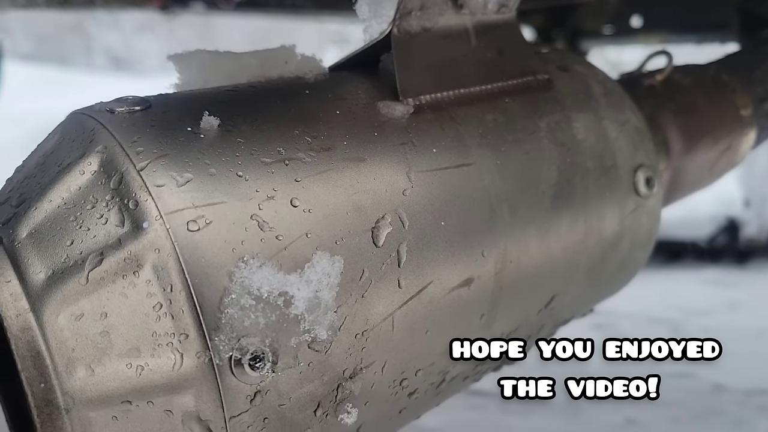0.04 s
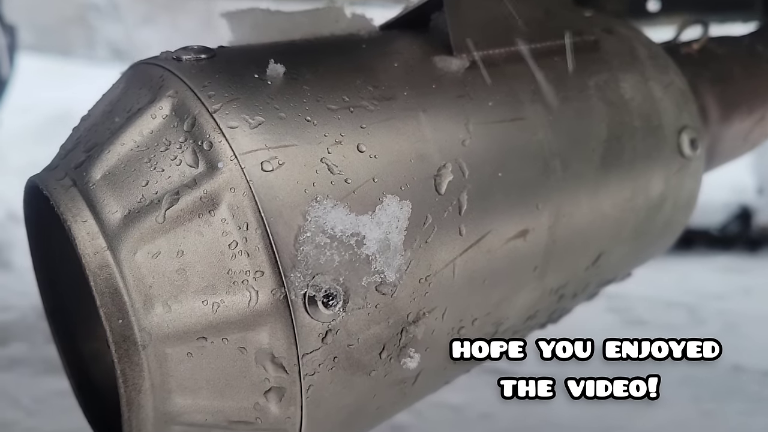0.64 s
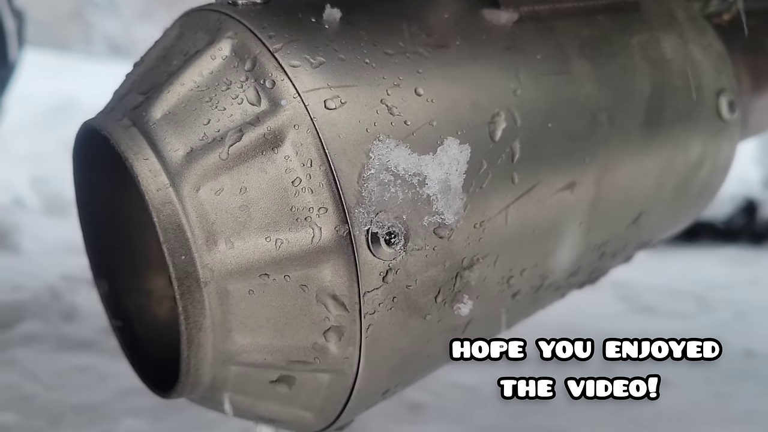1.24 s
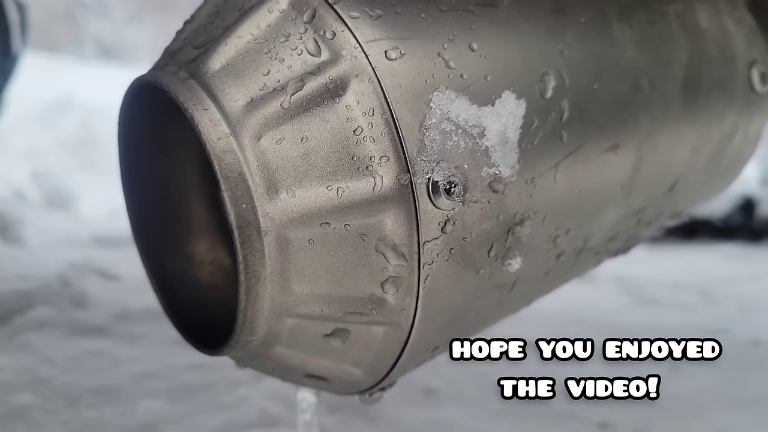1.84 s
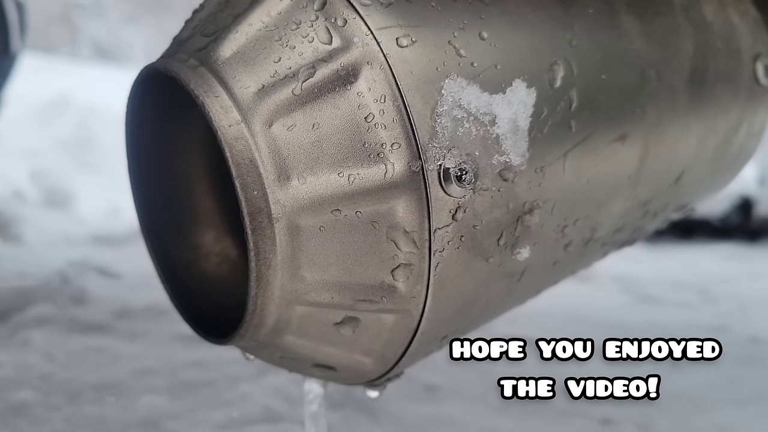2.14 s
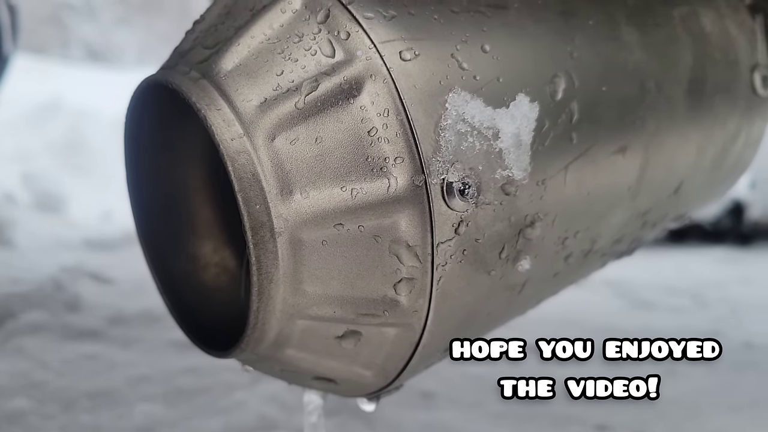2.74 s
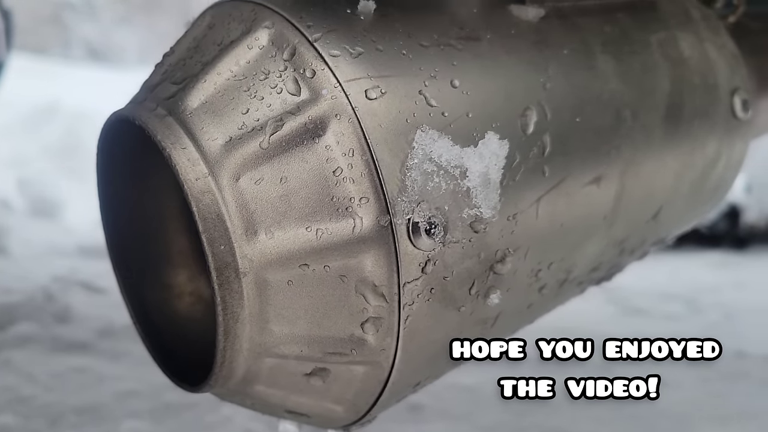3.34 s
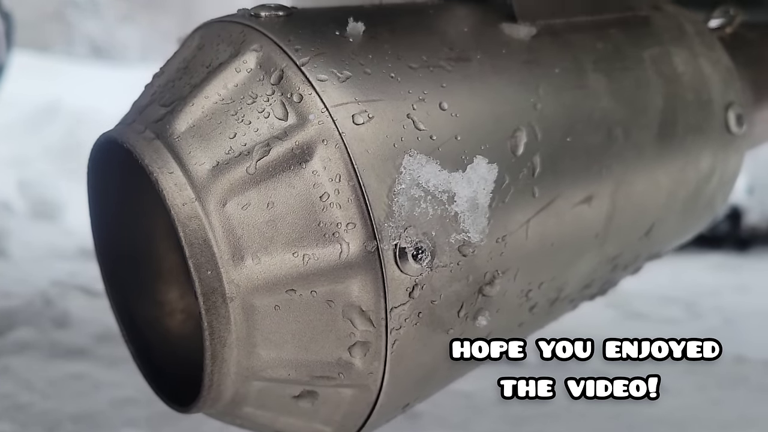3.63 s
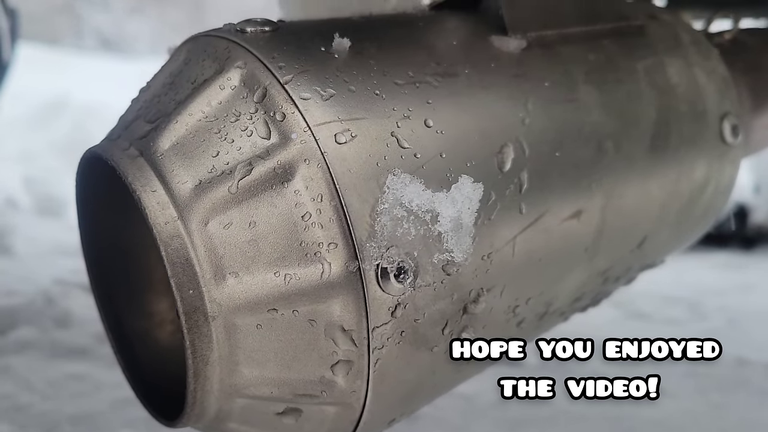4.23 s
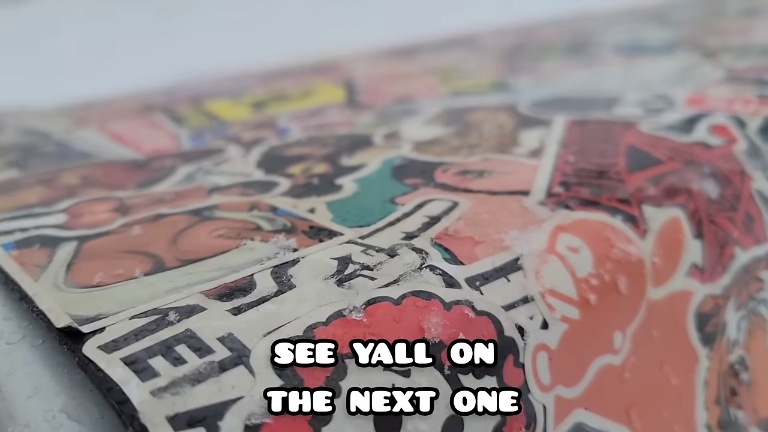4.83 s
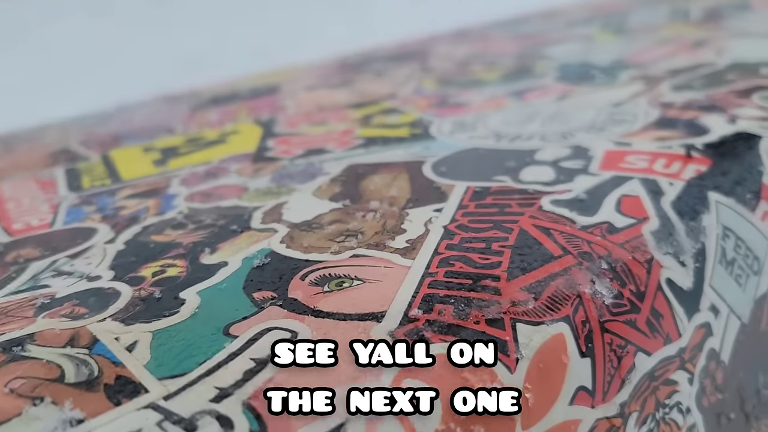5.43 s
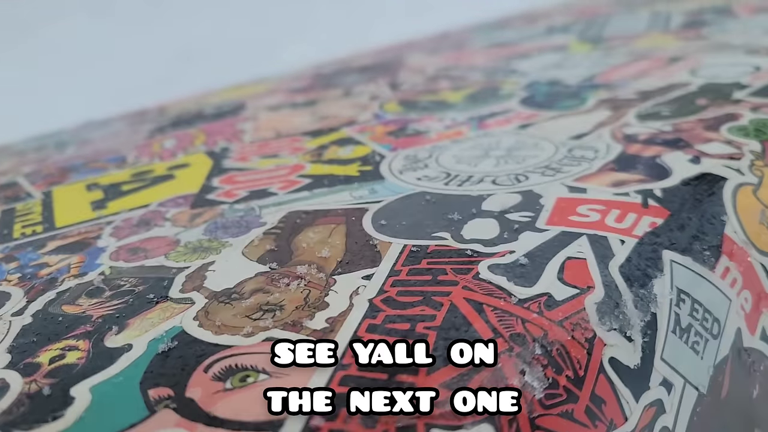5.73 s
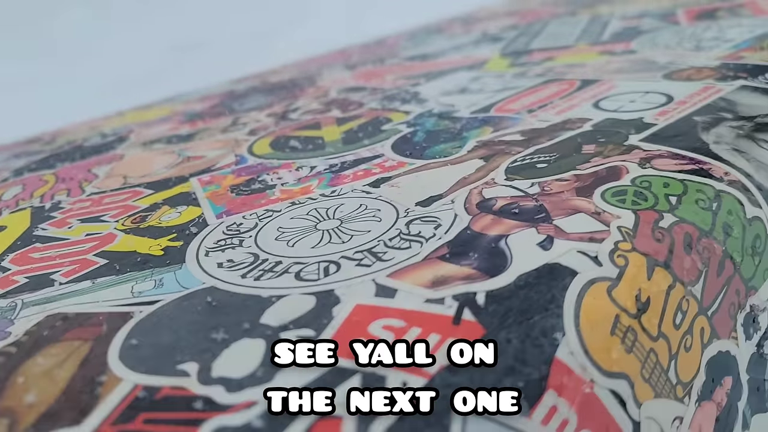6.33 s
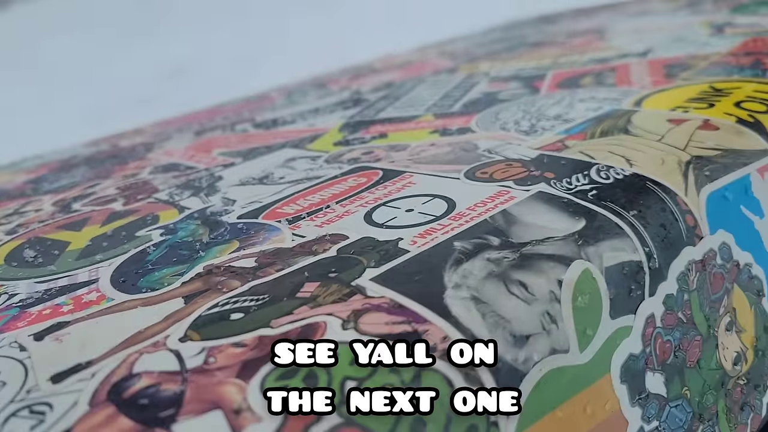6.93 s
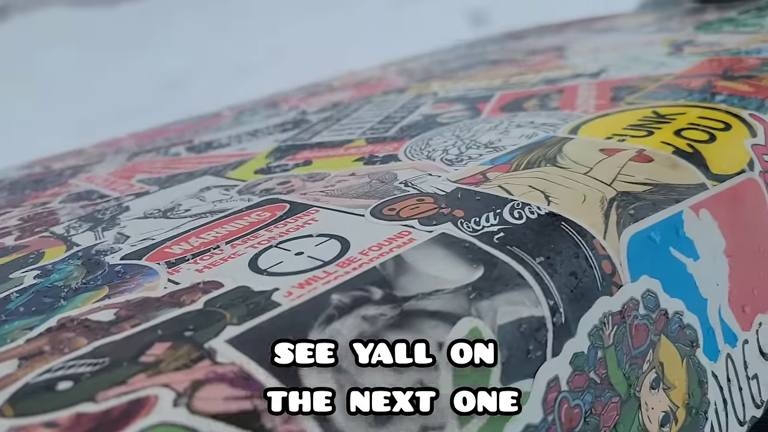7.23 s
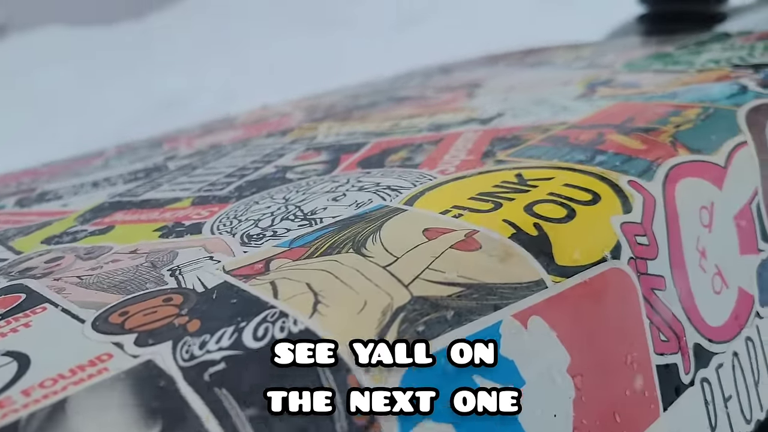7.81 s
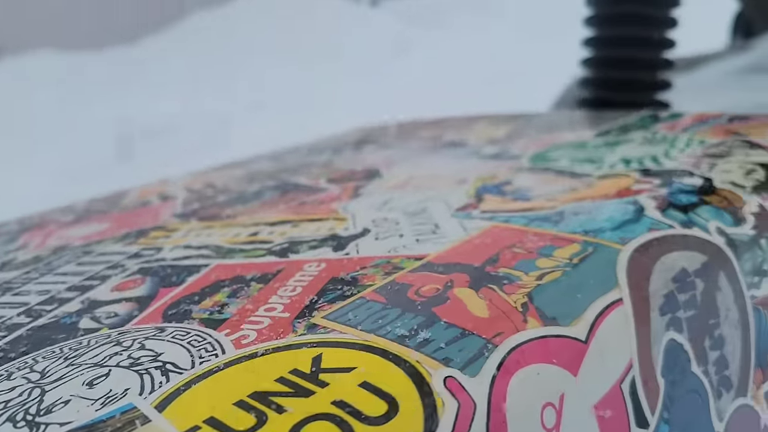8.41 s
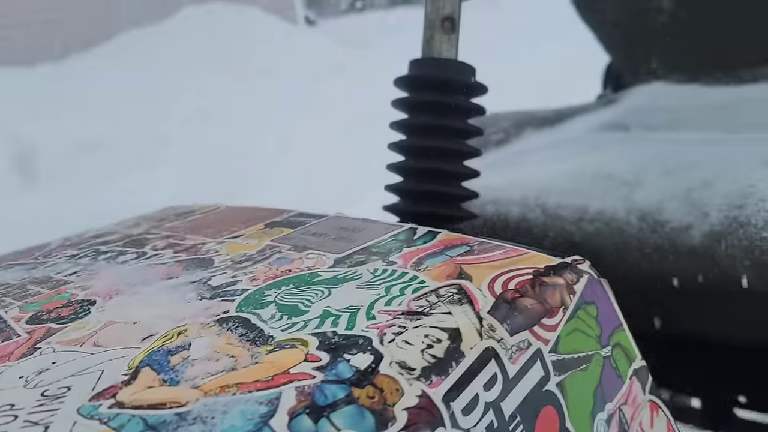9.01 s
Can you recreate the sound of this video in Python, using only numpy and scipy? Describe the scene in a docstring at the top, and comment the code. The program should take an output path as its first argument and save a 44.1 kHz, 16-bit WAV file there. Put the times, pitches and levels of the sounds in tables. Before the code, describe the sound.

A riding mower engine drones loudly at its muffler with spitting exhaust, then abruptly sounds quieter, with engine hum and valve clatter.

```python
"""Mower engine at a fast idle

Each engine cycle is four crank turns, with four even pumping strokes and four uneven firings.
First we listen at the steel muffler's mouth: the strokes and firings ring the can and pipe in a deep,
lumpy drone, and gas spits out with the two hard firings. Then we jump to a spot above the hood and
glide over it: the drone is far quieter, and the engine's own hum and valve clatter come through."""
import sys
import numpy as np
from scipy.fft import rfft, irfft, next_fast_len
from scipy.io import wavfile
from scipy.ndimage import uniform_filter1d, map_coordinates

SR = 44100
rng = np.random.default_rng(int(sys.argv[2]) if len(sys.argv) > 2 else 0)


def log_audio(samples):
    """Write samples as a 16-bit WAV file to the path given in sys.argv[1]."""
    # one column per channel
    frames = np.atleast_2d(samples).T
    # limit to full scale, then quantise
    limited = np.clip(frames, -1, 1)
    pcm = np.round(limited * 32767).astype(np.int16)
    wavfile.write(sys.argv[1], SR, pcm)


N = 403956
TIME = np.arange(N) / SR
JUMP_S = 4.473  # from the muffler to the hood
TURNS_PER_CYCLE = 4

# Engine speed in each spot, drifting as the governor hunts: time_s, cycles_per_s
MUFFLER_SPEED = [(0.0, 8.766), (0.35, 8.844), (0.99, 8.811), (2.11, 8.818), (2.4, 8.699), (3.08, 8.843),
                 (3.67, 8.685), (4.47, 8.849)]
HOOD_SPEED = [(4.47, 9.178), (5.6, 9.23), (5.96, 9.14), (6.92, 9.347), (7.71, 9.064), (8.2, 9.2),
              (8.88, 9.198), (9.16, 9.251)]
# Two hard firings and two soft ones: place_in_cycle, strength
FIRINGS = [(.154, 1.22), (.404, 1.22), (.707, .61), (.962, .56)]
# When the beat skips a quarter cycle forward or back, like a cut in the sound: time_s
SKIP_TIMES = [1.379, 2.172, 3.544]
# Tones of the exhaust pipe and the muffler can: pitch_hz, width_hz, muffler_gain, hood_gain
PIPE_TONES = [(72.3, 30.3, -0.93, -0.81), (101.6, 10.6, -0.092, -0.65), (117.7, 40.6, 1.144, 1.216),
              (183.2, 37.4, 0.28, 0.4), (234.5, 72.7, -0.042, -0.6), (306.3, 22, -0.32, -0.033)]
CAN_TONES = [(66.85, 9.84, 1.82, 2.5), (92.3, 59, -0.77, -1.05), (152.15, 24.5, 0.82, 0.97),
             (272, 14.5, 0.15, -0.01)]
# Gas jets (two cracks, the flow around them, two puffs):
# place_in_cycle, relative_db, rise_cycles, fall_cycles
GAS_JETS = [(.162, 1, 0.012, 0.0063), (.411, 2, 0.015, 0.0094), (0.19, -12, 0.2, .15),
            (.775, -7, 0.025, 0.029), (0.12, -5.5, .04, 0.047)]
# Valve clatter: place_in_cycle, relative_db, rise_cycles, fall_cycles
VALVE_HITS = [(.93, 3, 0.013, 0.18), (0.46, 3, 0.15, 0.095), (0.71, -8, .04, .06), (0.28, -14, .03, .05)]
# The hardest spits of gas, each with a knock of the can: time_s, relative_db, knock_offset_db
HARD_SPITS = [(0.1597, -15, -24), (0.3863, -19.5, -15.5), (0.5, -23, -16), (0.8387, -18.5, -26),
              (1.066, -18, -29), (1.18, -14.5, -25), (1.293, -23, -15), (1.6048, -22, -29),
              (2.0298, -14.5, -33), (2.1994, -14, -38), (2.3138, -12, -38), (2.428, -19, -35),
              (2.5443, -17, -27), (2.999, -18, -30), (3.227, -16, -35), (3.454, -22, -23),
              (3.626, -19.5, -24), (3.8537, -27, -11), (4.0848, -17, -33), (4.1982, -18, -26),
              (4.3113, -28, -10), (4.426, -23, -19)]
# Tones of the engine block: waves_per_cycle (rounded when played), closest_level_db, closest_time_s
HUM_TONES = [(44, -60, 4.3), (48, -61.5, 5.5), (52, -54.5, 5.1), (60, -59, 3.8), (76.56, -61, 6.1),
             (80.7, -62, 5.9), (92, -62.5, 6.3), (96.4, -59, 7.4), (99.6, -62, 7), (194.6, -66, 7)]

# Loudness of the gas sizzle at the muffler: time_s, level_db
SIZZLE_LEVELS = [(0, -41.5), (.6, -45), (1.3, -43.5), (2.2, -44), (4.47, -43.5)]
# Rise and fall of the noises over the hood: time_s, burble_gain_db, ring_gain_db, rasp_db, sizzle_db
HOOD_LEVELS = [(4.5, -47.5, -59, -52, -48), (5.5, -49, -58.5, -53.5, -50), (6.35, -48.5, -61, -51.5, -50),
               (6.9, -52, -54, -51, -48.5), (8.1, -51.5, -53.5, -51.5, -49.5),
               (9.16, -52.5, -56, -52, -52.5)]
# Metal chatter, growing as the engine gets closer: time_s, level_db
CHATTER_LEVELS = [(4.5, -67), (6.3, -69), (7.8, -66), (8.5, -58.5), (9.16, -56.5)]

# Tone colours of the gas and valve noises, from low to high: pitch_hz, relative_db
RUMBLE_COLOUR = [(15, -36), (29, -20), (40, -2), (75, 0.5), (130, -6.5), (300, -7), (450, -26), (900, -94)]
MUFFLER_BURBLE_COLOUR = [(180, -48), (300, -7), (415, -10.5), (656, -16), (833, -22), (980, -24.5),
                         (1200, -27.5), (1560, -30), (2640, -120)]
HOOD_BURBLE_COLOUR = [(190, -38), (320, 4.5), (482, -4), (512, -2), (559, -7), (657, -3), (679, -6.5),
                      (780, -7), (856, -0.5), (973, -17), (1200, -25), (1560, -73), (2640, -120)]
MUFFLER_RASP_COLOUR = [(590, -14), (1000, -1), (1130, -9), (1290, -3), (1470, -5), (2020, -3), (2430, -8),
                       (2670, -7.5), (3050, -9), (3600, -5.5), (4610, -13.5), (7040, -4), (8570, -21),
                       (10500, -18), (11800, -27), (15300, -47), (22000, -120)]
HOOD_RASP_COLOUR = [(590, -16), (1000, -0.5), (1110, -10), (1680, -4.5), (1820, -7), (1980, -7),
                    (2170, -10), (3020, -8), (3670, -14.5), (4420, -12), (5440, -14.5), (6760, -6.5),
                    (8570, -22.5), (10500, -22), (11800, -17), (15300, -27), (22000, -120)]
SPIT_COLOUR = [(600, -58), (1800, -28), (7000, -3), (10000, -21), (14000, 7)]
SIZZLE_COLOUR = [(6590, -14), (11200, -16), (12500, -2), (13100, 0), (15100, -0.5), (16000, -6)]
# Tone colours of the knocked can, hood panels and chattering metal: pitch_hz, relative_db
KNOCK_COLOUR = [(600, -22), (1300, -11), (1900, 8), (3800, -9), (6000, -5), (9000, -40)]
PANEL_COLOUR = [(450, -40), (640, -11), (720, -2.5), (790, -13), (870, -1), (990, -16.5), (1100, -1),
                (1400, -10.5), (1700, -13.5), (1820, -3.5), (1980, -16), (2200, -12), (3000, -16),
                (4500, -40)]
CHATTER_COLOUR = [(1600, -37), (2200, 3.5), (2550, -18), (3050, 1), (3800, -22), (6000, -38)]

# How much louder the left side is in each spot: pitch_hz, left_minus_right_db
MUFFLER_PAN = [(60, 2.5), (110, -1), (200, 0), (380, 8.5), (700, -2.5), (1290, -3), (2380, 1), (4400, -2.5),
               (8120, 1), (15000, -4)]
HOOD_PAN = [(60, -2.5), (110, -1.0), (200, -2.5), (380, -3.5), (700, -7.5), (1290, -5), (2380, -5),
            (4400, 0.5), (8120, -3.5), (15000, -4.5)]
# How far the left side's wave runs ahead at the muffler: pitch_hz, lead_radians
MUFFLER_LEAD = [(60, 0.024), (340, 0.86)]


def drone(cycles, cycle_hz, spot, pan, lead):
    """Firings ring the pipe and pumping strokes ring the can. Spot 0 is the muffler, 1 the hood."""
    harmonics = np.arange(1, 49)
    hz = harmonics * cycle_hz
    train = lambda pulses: sum(size * np.exp(-2j * np.pi * harmonics * place) for place, size in pulses)
    # the pistons push gas out once a turn
    strokes = [(.023 + turn / TURNS_PER_CYCLE, 1) for turn in range(TURNS_PER_CYCLE)]
    pipe = train(FIRINGS) * resonances(PIPE_TONES, hz, spot)
    can = train(strokes) * resonances(CAN_TONES, hz, spot)
    sides = amp(left_right(pan, hz)) * np.exp(1j * left_right(lead, hz))
    tones = (pipe + can) * sides / abs(sides.mean(0))
    places = np.linspace(0, 1, 4097)
    one_cycle = (tones @ np.exp(2j * np.pi * np.outer(harmonics, places))).real
    return np.array([np.interp(cycles % 1, places, side) for side in one_cycle])


def resonances(table, hz, spot):
    """How a pipe or can answers each pitch: most strongly near its own tones."""
    return sum(gains[spot] * 1j * hz * width / (centre ** 2 - hz ** 2 + 1j * hz * width)
               for centre, width, *gains in table)


def at_muffler():
    """At the outlet: strong pulses of uneven force, with jets of gas."""
    speed, = curves(MUFFLER_SPEED)
    cycles = np.cumsum(speed) / SR + 0.0021 * wobble(45)
    skipped = uniform_filter1d(np.searchsorted(SKIP_TIMES, TIME) % 2 * 1., size=200)
    beat = lambda at: drone(at, speed.mean(), 0, MUFFLER_PAN, MUFFLER_LEAD)
    pulses = (1 - skipped) * beat(cycles) + skipped * beat(cycles + 1 / 4)
    weak_firing_db = -11 * np.exp(-((TIME - 2.6) / 0.012) ** 2)  # one firing falls short
    pulses *= amp(-33 + 0.39 * wobble(60) + weak_firing_db)
    rumble, burble, rasp, sizzle = gas_jets(cycles + skipped / 4)
    # the loudest pressure peaks are rounded off
    return round_tops(pulses + rumble + burble, limit=.25) + rasp + sizzle + spits()


def gas_jets(cycles):
    """Each firing tears out a jet of gas, heard as four noises from low to high."""
    rumble = amp(-32) * bursts(cycles, GAS_JETS, steady_db=-8.5, scatter_db=1.2, stretch=2.9)
    rumble = rumble * noise(RUMBLE_COLOUR, MUFFLER_PAN, width_db=-7.5)
    # the burble is partly the pulses' own fine shape and partly swirling gas
    flow = repeating(cycles, MUFFLER_BURBLE_COLOUR, width_db=3)
    flow += amp(-1.2) * noise(MUFFLER_BURBLE_COLOUR, MUFFLER_PAN, width_db=-0.3)
    burble = amp(-41) * bursts(cycles, GAS_JETS, steady_db=-10.5, scatter_db=0.5, stretch=1.5) * flow
    rasp = amp(-47.5) * bursts(cycles, GAS_JETS, steady_db=-14, scatter_db=1.1)
    rasp = rasp * noise(MUFFLER_RASP_COLOUR, MUFFLER_PAN, width_db=1.3)
    sizzle = amp(curves(SIZZLE_LEVELS)[0]) * bursts(cycles, GAS_JETS, steady_db=-20, scatter_db=0.7)
    sizzle = sizzle * noise(SIZZLE_COLOUR, MUFFLER_PAN, width_db=-1.2)
    return rumble, burble, rasp, sizzle


def spits():
    """Now and then a hard firing spits sharply and knocks the steel can."""
    spike = lambda time_s, fade_s: np.exp(-abs(TIME - time_s) / fade_s)
    spit = sum(amp(db - 4) * spike(s, fade_s=.0011) for s, db, _ in HARD_SPITS)
    knock = sum(amp(db + offset_db + 2) * spike(s, fade_s=.0023) for s, db, offset_db in HARD_SPITS)
    return (spit * noise(SPIT_COLOUR, MUFFLER_PAN, width_db=-1)
            + knock * noise(KNOCK_COLOUR, MUFFLER_PAN, width_db=0))


def over_hood():
    """Over the hood: the exhaust is farther off, so the engine's own sounds come through."""
    speed, = curves(HOOD_SPEED)
    cycles = np.cumsum(speed * (TIME > JUMP_S)) / SR - .495 + 0.00085 * wobble(40)
    pulses = drone(cycles, speed[TIME > JUMP_S].mean(), 1, HOOD_PAN, lead=[(0, 0)])
    pulses = round_tops(pulses * amp(-48 + 0.48 * wobble(40)), limit=.058)
    burble_db, ring_db, rasp_db, sizzle_db = curves(HOOD_LEVELS)
    return (pulses + distant_gas(cycles, burble_db) + panel_ring(cycles, ring_db)
            + valve_clatter(cycles, rasp_db, sizzle_db) + metal_chatter() + block_hum(cycles))


def block_hum(cycles):
    """The engine block hums. Each wavering tone swells as we pass its source."""
    half_power_s = 2  # this long from its closest point, a tone has half its power
    total = np.zeros((2, N))
    for waves, db, closest_s in HUM_TONES:
        waver_db = 1.35 * np.array([wobble(1.49), wobble(1.46)]) + 1.5 * wobble(25)
        level = amp(db + waver_db) / np.hypot(1, (TIME - closest_s) / half_power_s)
        drift = 0.81 * np.array([wobble(0.82), wobble(0.813)])
        total += np.sqrt(2) * level * np.sin(2 * np.pi * (round(waves) * cycles + rng.random()) + drift)
    return total


def valve_clatter(cycles, rasp_db, sizzle_db):
    """The valves clatter in step with the engine, in bursts of rasp and high sizzle."""
    rasp = amp(rasp_db) * bursts(cycles, VALVE_HITS, steady_db=1.5, scatter_db=1.5)
    rasp = rasp * noise(HOOD_RASP_COLOUR, HOOD_PAN, width_db=1.1)
    sizzle = amp(sizzle_db) * bursts(cycles, VALVE_HITS, steady_db=-9, scatter_db=0.4)
    return rasp + sizzle * noise(SIZZLE_COLOUR, HOOD_PAN, width_db=0)


def distant_gas(cycles, burble_db):
    """The exhaust gas rumbles and burbles from afar."""
    rumble = amp(-49) * noise(RUMBLE_COLOUR, HOOD_PAN, width_db=-10)
    swirl = amp(-5) * noise(HOOD_BURBLE_COLOUR, HOOD_PAN, width_db=-4.5)
    pattern = amp(-4.5) * repeating(cycles, HOOD_BURBLE_COLOUR, width_db=-9)
    return rumble + amp(burble_db) * (swirl + pattern)


def panel_ring(cycles, ring_db):
    """The hood's panels ring, partly at random and partly alike in every cycle."""
    shiver = amp(-0.6) * noise(PANEL_COLOUR, HOOD_PAN, width_db=3.5)
    pattern = amp(-3) * repeating(cycles, PANEL_COLOUR, width_db=0.6)
    return amp(ring_db) * (shiver + pattern)


def metal_chatter():
    """A flickering metal chatter grows as we near the engine."""
    level_db = curves(CHATTER_LEVELS)[0] + 1.5 * wobble(120)
    return amp(level_db) * noise(CHATTER_COLOUR, HOOD_PAN, width_db=.3)


def bursts(cycles, table, steady_db, scatter_db, stretch=1):
    """A loudness curve of average power 1: a steady part plus bursts, a new size in every cycle."""
    power = amp(steady_db) ** 2
    for place, db, rise, fall in table:
        nearest = np.round(cycles - place)
        offset = cycles - place - nearest
        sizes = amp(db + scatter_db * rng.standard_normal(128))
        shape = np.exp(-abs(offset) / stretch / np.where(offset < 0, rise, fall))
        power = power + (sizes[nearest.astype(int)] * shape) ** 2
    return np.sqrt(power / power.mean())


def repeating(cycles, colour, width_db):
    """A fine stereo texture that is the same in every engine cycle."""
    harmonics = np.arange(4097)
    cycle_hz = np.median(np.diff(cycles[-SR:])) * SR
    phases = np.exp(2j * np.pi * rng.random((2, len(harmonics))))
    middle, spread = irfft(amp(at_pitch(colour, harmonics * cycle_hz)) * phases)
    pair = stereo(middle, spread, width_db) / middle.std()
    return np.array([np.interp(cycles % 1, np.arange(len(side)) / len(side), side) for side in pair])


def noise(colour, pan, width_db):
    """Stereo noise with a tone colour; the average of its two sides has power 1."""
    middle, spread = filtered(rng.standard_normal((2, N)), lambda hz: amp(at_pitch(colour, hz)))
    pair = filtered(stereo(middle, spread, width_db), lambda hz: amp(left_right(pan, hz)))
    return pair / pair.mean(0).std()


def round_tops(wave, limit):
    """The tops of the wave are gently squashed to stay under the limit."""
    return wave / (1 + abs(wave / limit) ** 4) ** (1 / 4)


def stereo(middle, spread, width_db):
    """Left and right sides; a higher width_db makes them less alike."""
    return np.array([middle + amp(width_db) * spread, middle - amp(width_db) * spread])


def left_right(table, hz):
    """Gives plus half of a table's value to the left side and minus half to the right."""
    return np.outer([.5, -.5], at_pitch(table, hz))


def filtered(sound, gain_at):
    """Turns each pitch in a sound up or down by gain_at(hz)."""
    size = next_fast_len(N + 8192)
    return irfft(rfft(sound, size) * gain_at(np.fft.rfftfreq(size, 1 / SR)), size)[..., :N]


def wobble(rate):
    """A smooth random curve through rate new values a second."""
    return map_coordinates(rng.standard_normal(int(N * rate / SR) + 4), [TIME * rate])


def curves(table):
    """Turns each column after the time into one value per sample."""
    times, *columns = np.transpose(table)
    return [np.interp(TIME, times, column) for column in columns]


def at_pitch(table, hz):
    """Reads between the rows of a (pitch_hz, value) table on a log scale."""
    pitches, values = np.transpose(table)
    return np.interp(np.log(hz + 1), np.log(pitches + 1), values)


def amp(db):
    """Decibels to gain."""
    return 10 ** (np.asarray(db) / 20)


def scene():
    """The muffler, a blink of silence, then the hood."""
    hood_fade_in = np.clip((TIME - JUMP_S - .004) / .01, 0, 1)
    return at_muffler() * (TIME < JUMP_S) + over_hood() * hood_fade_in


def record(dry):
    """Removes the very highest treble."""
    return filtered(dry, lambda hz: hz < 15900)


dry = scene()
out = record(dry)
log_audio(out)
```